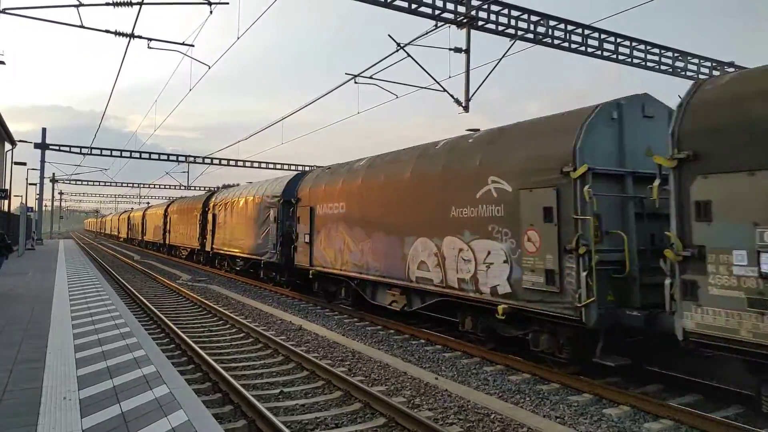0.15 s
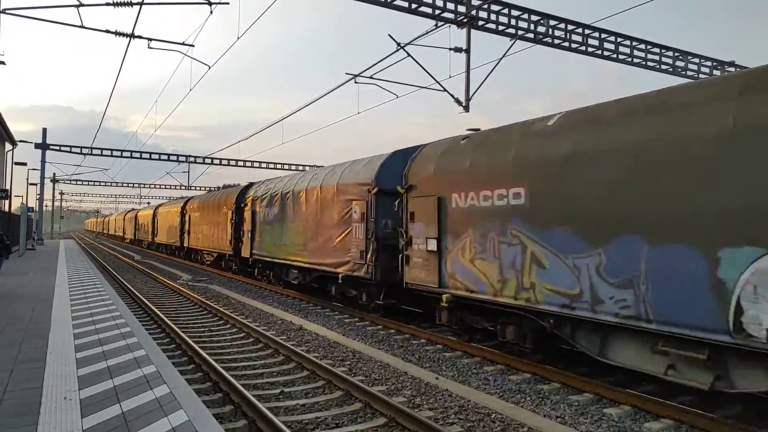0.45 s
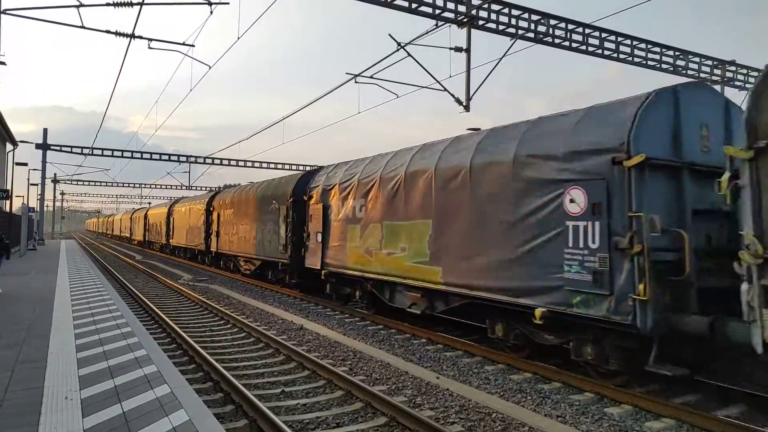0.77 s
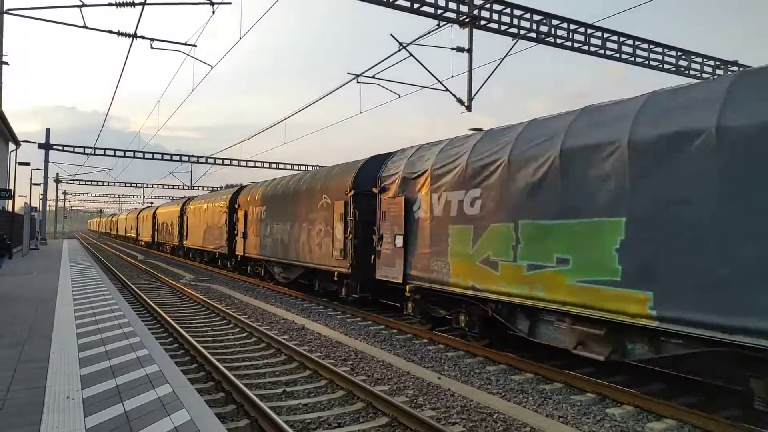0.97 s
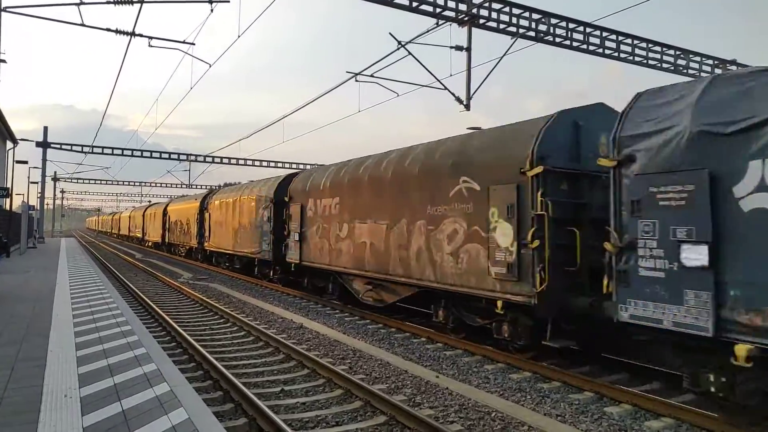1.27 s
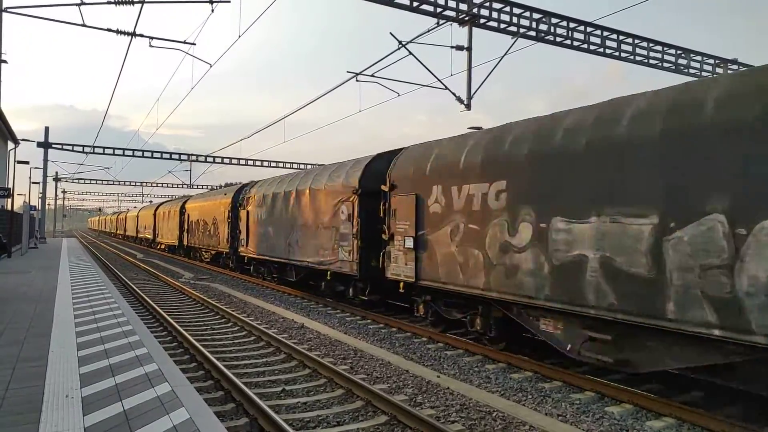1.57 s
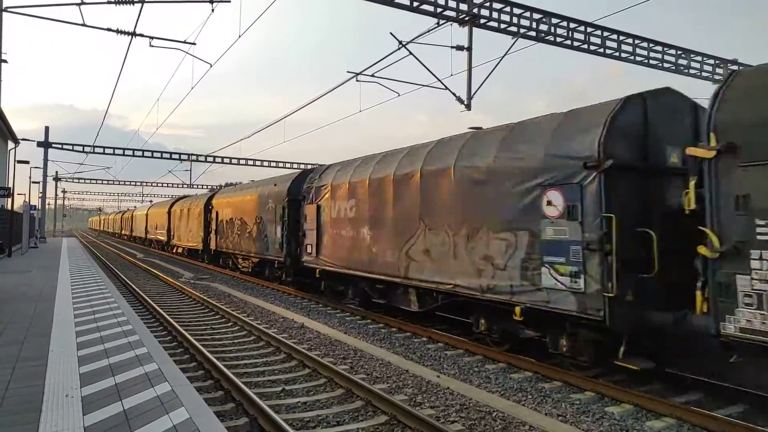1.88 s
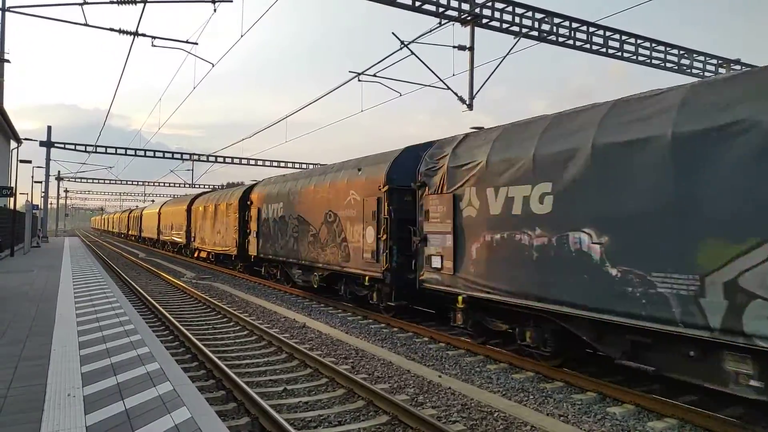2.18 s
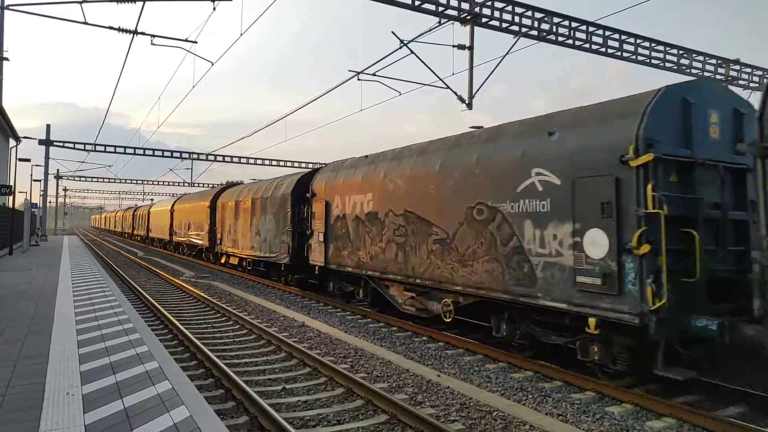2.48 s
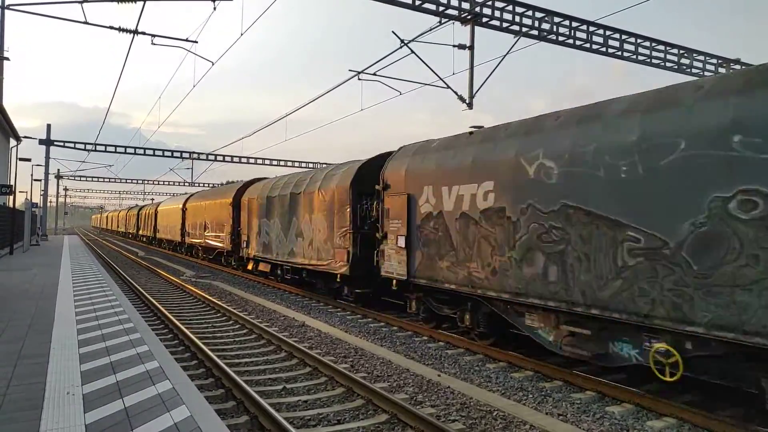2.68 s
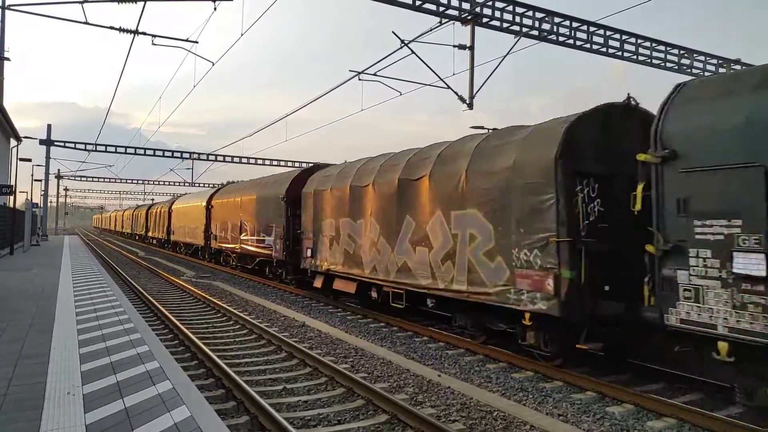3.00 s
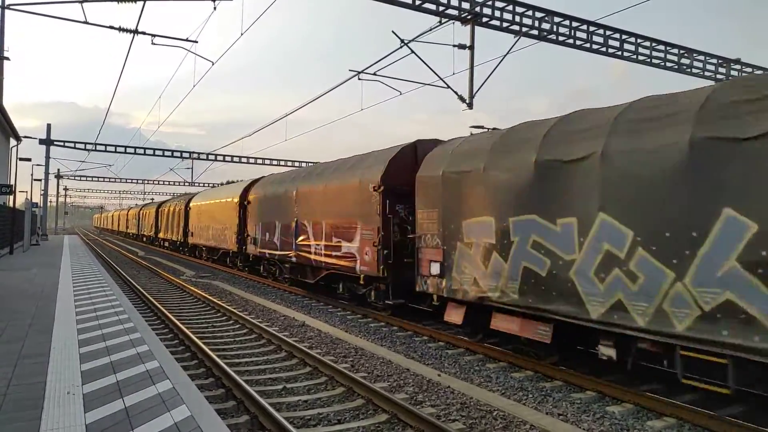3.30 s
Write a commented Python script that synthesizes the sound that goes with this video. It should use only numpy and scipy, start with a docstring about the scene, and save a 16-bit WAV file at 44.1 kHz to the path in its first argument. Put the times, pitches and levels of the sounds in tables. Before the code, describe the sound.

A freight train rolls steadily past an open station platform, rumbling, roaring and hissing with loose rattles; midway a flat wheel bangs rapidly, booming through the wagons, then fades into the rush. Close stereo microphones.

```python
"""From a station platform, a long freight train rolls by one track away, heard on two microphones.
From the start, filtered noise gives wagon rumble, rail roar, ringing wheels, hiss and ground tremor;
narrow resonances sing through it, and randomly tapped resonators rattle as loose fittings.
Thin flange squeaks come and go. A wheel's flat spot joins them, each knock setting off rail and wagon
modes and bursts of noise; after the two strongest booms the wagon body drones on a wavering sine."""
import sys
import numpy as np
from scipy import signal
from scipy.fft import rfft, irfft, next_fast_len
from scipy.io import wavfile
from scipy.ndimage import uniform_filter1d, minimum_filter1d

SR = 44100
rng = np.random.default_rng(int(sys.argv[2]) if len(sys.argv) > 2 else 0)


def store_pcm(level_fs):
    """Save levels as 16-bit WAV."""
    pcm = np.round(np.clip(level_fs, -1, 1) * 32767).astype(np.int16)
    wavfile.write(sys.argv[1], SR, np.atleast_2d(pcm).T)


N = 152145
T = np.arange(N) / SR  # seconds
SIZE = next_fast_len(N + 4096)  # transform length, with room beyond the scene
HZ = np.maximum(np.arange(SIZE // 2 + 1) * SR / SIZE, 1)

# Noise colours before any level curve: wagons, rails, wheels, rolling hiss and the ground underfoot.
# Each row: frequency in Hz, density in dB per Hz.
RUMBLE_COLOUR = [(60, -111), (105, -53.5), (130, -46.5), (165, -39), (225, -39.5), (275, -46.5),
                 (330, -45.5), (430, -64.5), (700, -85), (1500, -120)]
ROAR_COLOUR = [(200, -48.5), (560, -52), (760, -56), (1020, -56), (1300, -63), (1800, -65)]
WHEELS_COLOUR = [(1300, -61), (1650, -56.5), (2150, -60), (2600, -61), (3100, -66), (4500, -123)]
HISS_COLOUR = [(1800, -75), (3000, -69.5), (3400, -62), (3770, -72.5), (4050, -64), (4300, -65.5),
               (4900, -66), (5500, -62.5), (6900, -61.5), (7400, -57.5), (8300, -61.5), (8700, -66.5),
               (9200, -75), (9850, -77), (10400, -93.5), (11250, -86.5), (12100, -87), (13800, -91),
               (15400, -102)]
GROUND_COLOUR = [(12, -53), (48, -56), (82, -51), (108, -52), (200, -61)]

# How each noise rises and falls as the bogies pass. Each row: time in seconds, level in dB.
RUMBLE_LEVEL = [(0, -4.5), (.6, -4), (.87, -2), (1, -3.5), (1.25, -0.5), (1.62, -.5), (1.675, -6),
                (1.75, -1.5), (2, -7), (2.4, -3.5), (2.8, -8), (3.12, -5), (3.45, -9)]
ROAR_LEVEL = [(0, 1.2), (.65, -1), (1.25, 2), (1.5, -1), (1.68, -2.5), (1.8, -1.5), (1.92, -1.8),
              (3.45, -1.1)]
WHEELS_LEVEL = [(0, -1.7), (1.2, 1.4), (1.75, 1), (2.5, 0.1), (3.45, 0.95)]
HISS_LEVEL = [(0, -0.3), (.5, -0.15), (.67, -1.2), (.85, 0), (1.25, 0.71), (1.55, 1.7), (1.93, -0.88),
              (2.2, 0.21), (2.5, -1.7), (3.15, -1.7), (3.45, -1.8)]

# Narrow resonances that the rolling keeps ringing.
# Each row: centre in Hz, half-width in Hz, rms level at the start in dB, fade in dB per second.
SINGING = [(501.6, 10.6, -26, 5), (2065, 205, -27, 2.5), (240, 13.4, -30, 2), (362, 25, -45, -0.5),
           (4290, 89, -43.5, -2)]

# Brief thin flange squeaks.
# Each row: middle in seconds, length in seconds, pitch at the middle in Hz, half-width in Hz, level in dB.
SQUEAKS = [(0.877, .05, 11330, 70.4, -52), (1.13, .22, 11230, 190, -50), (1.32, .07, 13700, 140, -46),
           (1.44, .2, 13550, 160, -59), (1.605, 0.09, 13100, 80, -52)]

# The strikes of the flat spot.
# Each row: time in seconds, thud in dB, boom in dB, boom pitch in Hz, clang in dB, clatter and hiss in dB.
KNOCKS = [(0.913, -33, -15, 179, -4, -2), (1.043, -20, -12, 219, -1, 1), (1.17, -32, -8, 162, 3.5, -0.5),
          (1.303, 0, -2, 189, 5, 0), (1.433, -22, -5, 184, 1, 2), (1.565, -22, -7, 147, -6, -5),
          (1.697, -42, -1, 233, -15, -1), (1.851, -12, -11, 212, -1, -4.5), (1.985, -34, -9.5, 234, -8, -9),
          (2.111, -43, -9.5, 229, -15, -21)]
# Rail modes in a thud. Each row: mean frequency in Hz, relative level in dB, 60 dB decay in seconds.
THUD_MODES = [(405, -8.5, 0.089), (474, -5, .06), (570, 3.5, 0.027), (800, -8, 0.024), (1160, -13, 0.027),
              (1400, -3.5, 0.12)]
# Wagon modes in a boom. Each row: ratio to the boom pitch, relative level in dB, 60 dB decay in seconds.
BOOM_MODES = [(0.999, -1, 0.21), (1.439, -2, 0.16)]
# Struck rail and wheel, then shaken bogie, before each knock's level.
# Each row: frequency in Hz, density in dB per Hz.
CLANG_COLOUR = [(130, -64), (330, -50.5), (700, -50.5), (1200, -51.5), (1600, -56)]
CLATTER_COLOUR = [(1100, -64), (1650, -57.5), (2500, -58), (3500, -80)]

# Droning wagon body. Each row: start in seconds, length in seconds, mean pitch in Hz, rms level in dB.
DRONES = [(1.35, 0.167, 171.4, -20.5), (1.75, 0.2, 235.4, -21.5)]

# The microphone pair. Each row: frequency in Hz, side minus mid in dB, lag of the left in milliseconds.
PAIR = [(40, -22, .01), (90, -18.5, .02), (180, -14.5, .03), (300, -10.5, .06), (480, -5.5, .15),
        (760, -3.1, .28), (1030, -4.2, .41), (1500, -1.8, .33), (2150, -2.4, .43), (3100, -1.6, .48),
        (8000, -.9, .52)]
# Tone of the two sides. Each row: frequency in Hz, left minus right in dB.
BALANCE = [(40, .1), (150, 1), (280, 1.6), (500, 3.6), (1050, 3.4), (1600, 5.5), (2200, 3), (2800, 0),
           (3800, -1.3), (4600, 0), (7300, -2), (7900, 2), (8600, 8), (9800, 5), (15000, 4)]


def from_db(db):
    """Decibels to gain."""
    return 10 ** (np.asarray(db) / 20)


def over_hz(points, axis=1):
    """One column of a table, spread over log frequency."""
    rows = np.array(points)
    return np.interp(np.log(HZ), np.log(rows[:, 0]), rows[:, axis])


def level(points):
    """A level curve as a gain."""
    return from_db(np.interp(T, *np.transpose(points)))


def colour(points):
    """A spectrum as a gain, falling steeply beyond both ends."""
    outside = np.maximum(np.maximum(HZ / points[-1][0], points[0][0] / HZ), 1)
    return from_db(over_hz(points)) / outside ** 4


def drift(rate_hz):
    """Smooth random wander with spread 1: noise through two equal low-pass poles."""
    step = 40  # samples between drawn points
    pole = np.exp(-2 * np.pi * rate_hz * step / SR)
    draws = rng.standard_normal(N // step + 2002)
    slow = signal.lfilter([1], [1, -2 * pole, pole * pole], draws)[2000:]  # settled part
    return np.interp(np.arange(N) / step, np.arange(len(slow)), slow / slow.std())


def stereo_noise(gain):
    """Spectrum of a wide noise source; the pair's side level sets how alike the two sides are."""
    mid, side = rfft(rng.standard_normal((2, SIZE))) * np.sqrt(SR / 2)
    width = from_db(over_hz(PAIR))
    return gain * (mid + width * side * [[1], [-1]]) / np.sqrt(1 + width ** 2)


def wash(spectrum):
    """Even, coloured stereo noise."""
    return irfft(stereo_noise(colour(spectrum)), SIZE)[:, :N]


def band_of(noise, place, k):
    """The stretch of a noise spectrum around place k, crossfading into its neighbours."""
    return irfft(noise * np.maximum(1 - abs(place - k), 0), SIZE)[:, :N]


def rush(spectrum, flutter_db, flutter_hz, count=10):
    """Coloured stereo noise whose octaves flutter, partly together."""
    noise = stereo_noise(colour(spectrum))
    together = drift(flutter_hz)
    octave = np.clip(np.log2(HZ / SR * 2) + count - .5, 0, count - 1)
    out = 0
    for k in range(count):
        flutter = .5 * together + drift(flutter_hz)
        out = out + band_of(noise, octave, k) * from_db(flutter_db * flutter)
    return out


def shimmer(spectrum, low_hz, high_hz, swing_db, count):
    """Patchy noise: narrow stretches swell and sink on their own, differently on each side."""
    noise = stereo_noise(colour(spectrum))
    place = np.interp(HZ, [low_hz, high_hz], [0, count - 1])
    rate_hz = 10.6
    out = 0
    for k in range(count):
        swing = np.minimum([drift(rate_hz), drift(rate_hz)], 1)  # swells are capped, dips are not
        gain = from_db(swing_db * swing) if k < count - 1 else 1  # the very top stays even
        out = out + band_of(noise, place, k) * gain
    return out


def resonance(hz, width, bend_hz):
    """Stereo noise in one narrow resonance whose centre moves by bend_hz, rms 1."""
    noise = irfft(stereo_noise(1 / (1 + ((HZ - hz) / width) ** 2)), SIZE)
    moved = signal.hilbert(noise)[:, :N] * np.exp(2j * np.pi * np.cumsum(bend_hz) / SR)
    return moved.real / moved.real.std()


def rolling():
    """Rough wheels on rough rails excite wagons, rails, wheels, contact hiss, ground and resonances."""
    rumble = level(RUMBLE_LEVEL) * rush(RUMBLE_COLOUR, flutter_db=1.15, flutter_hz=11.5)

    roar = shimmer(ROAR_COLOUR, low_hz=347, high_hz=1534, swing_db=3, count=9)
    roar_grit = from_db(1.6 * drift(46))  # quick unevenness, spread in dB
    roar = level(ROAR_LEVEL) * roar_grit * roar

    wheels = shimmer(WHEELS_COLOUR, low_hz=1177, high_hz=3220, swing_db=4.5, count=20)
    wheels = level(WHEELS_LEVEL) * wheels

    hiss = shimmer(HISS_COLOUR, low_hz=2795, high_hz=9240, swing_db=6, count=36)
    hiss = level(HISS_LEVEL) * hiss

    out = rumble + roar + wheels + hiss + wash(GROUND_COLOUR)
    for hz, width, db, fade in SINGING:
        waver_hz = .012 * hz * drift(4)  # spread is a share of the pitch
        out += from_db(db - fade * T) * resonance(hz, width, waver_hz)
    return out


def rattles(count=18):
    """Loose couplings and fittings tap at random; each pitch rings, each tap varies left and right."""
    taps_per_s, tap_db = 150, -32.5  # rate shared by all pitches
    ring_cycles = 91  # cycles to fall 60 dB
    out = np.zeros((2, N))
    for hz in np.geomspace(330, 2700, count):
        taps = (rng.random(N) < taps_per_s / count / SR) * from_db(tap_db)
        strikes = taps * (1 + .5 * rng.standard_normal((2, N)))
        turn = 2 * np.pi * hz / SR
        pole = np.exp(-np.log(1000) * hz / ring_cycles / SR)
        resonator = [1, -2 * pole * np.cos(turn), pole * pole]
        # the tiny offset keeps the filter off vanishing numbers
        out += signal.lfilter([0, np.sin(turn)], resonator, strikes + 1e-18)
    return out


def squeaks():
    """A flange brushes the rail unevenly; its thin note sags as the wheel goes by."""
    sag_hz_per_s, rough_db = 1500, 4
    out = 0
    for middle, length, hz, width, db in SQUEAKS:
        note = resonance(hz, width, sag_hz_per_s * (middle - T))
        envelope = np.exp(-(2 * (T - middle) / length) ** 2)
        out = out + from_db(db) * envelope * note
    return from_db(rough_db * drift(40)) * out


def ring(start, hz, t60):
    """A struck mode: a sine from the start, decaying exponentially from height 1."""
    age = np.maximum(T - start, 0)
    return np.sin(2 * np.pi * hz * age) * np.exp(-np.minimum(np.log(1000) * age / t60, 20))


def swell(start, rise, fall):
    """A rise and an exponential fall, time constants in seconds, top 1."""
    age = np.maximum(T - start, 0)
    shape = (1 - np.exp(-age / rise)) ** 2 * np.exp(-age / fall)
    return shape / shape.max()


def rail_thud(strike):
    """The struck rail rings in several modes, each slightly scattered in time and pitch."""
    out = 0
    for hz, db, t60 in THUD_MODES:
        start = strike + rng.uniform(0.0010178, 0.00134)
        pitch = hz * (1 + 0.0325 * rng.standard_normal())
        out = out + from_db(db) * ring(start, pitch, t60)
    return out


def wagon_boom(strike, boom_hz):
    """The wagon answers the strike with low decaying modes that build up gradually."""
    lag_s, rise_s = 0.00756, 0.023
    build_up = 1 - np.exp(-np.maximum(T - strike - lag_s, 0) / rise_s)
    out = 0
    for ratio, db, t60 in BOOM_MODES:
        start = strike + lag_s * rng.uniform(0.49, 1.484)
        out = out + from_db(db) * build_up * ring(start, boom_hz * ratio, t60)
    return out


def wheel_flat():
    """Each knock thuds and clangs in the rail, booms in the wagon and shakes clatter and hiss from the bogie."""
    body = clang = clatter = hiss = 0
    for strike, thud_db, boom_db, boom_hz, clang_db, clatter_db in KNOCKS:
        body = body + from_db(thud_db) * rail_thud(strike)
        body = body + from_db(boom_db) * wagon_boom(strike, boom_hz)
        clang = clang + from_db(clang_db) * swell(strike, rise=0.0019, fall=0.048)
        clatter = clatter + from_db(clatter_db) * swell(strike, rise=0.0074, fall=0.045)
        hiss = hiss + from_db(clatter_db) * swell(strike, rise=0.068, fall=0.016)
    low_cut = signal.butter(2, 68, "high", fs=SR, output="sos")  # Hz
    out = signal.sosfilt(low_cut, body) + clang * wash(CLANG_COLOUR)
    out = out + clatter * rush(CLATTER_COLOUR, flutter_db=2.9, flutter_hz=110)
    return out + hiss * wash(HISS_COLOUR)


def drones():
    """After the two strongest booms the wagon body keeps droning on one slightly wavering note."""
    edge_s, waver_hz = 0.026, 1.39
    out = 0
    for start, length, hz, db in DRONES:
        hold = np.clip(np.minimum(T - start, start + length - T) / edge_s, 0, 1)
        phase = 2 * np.pi * np.cumsum(hz + waver_hz * drift(9.8)) / SR
        out = out + hold * from_db(db) * np.sqrt(2) * np.sin(phase)
    return out


def scene():
    """The whole train, as it reaches the left and the right microphone."""
    train = rfft(rolling() + rattles() + squeaks() + wheel_flat() + drones(), SIZE)
    sides = np.array([[.5], [-.5]])  # left and right each take half the difference
    tone = from_db(sides * over_hz(BALANCE))
    lag_s = over_hz(PAIR, axis=2) / 1000
    delay = np.exp(-2j * np.pi * HZ * lag_s * sides)
    return irfft(train * tone * delay, SIZE)[:, :N]


def record(dry):
    """A quick limiter holds the peaks under full scale; then the top is cut."""
    ceiling, span = .99, int(.001 * SR)  # span is 1 ms in samples
    gain = ceiling / np.maximum(abs(dry).max(axis=0), ceiling)
    gain = uniform_filter1d(minimum_filter1d(gain, 2 * span), span)
    top_cut = signal.ellip(10, .1, 80, 15650, fs=SR, output="sos")  # cutoff in Hz
    return signal.sosfilt(top_cut, dry * gain)


dry = scene()
out = record(dry)
store_pcm(out)
```